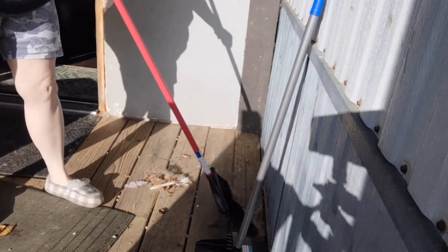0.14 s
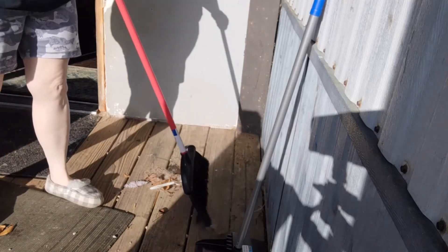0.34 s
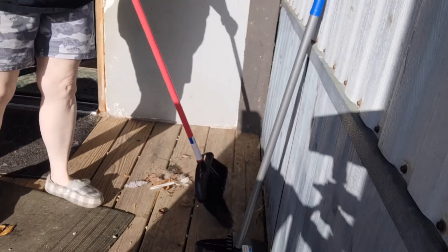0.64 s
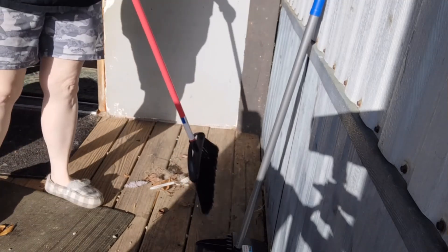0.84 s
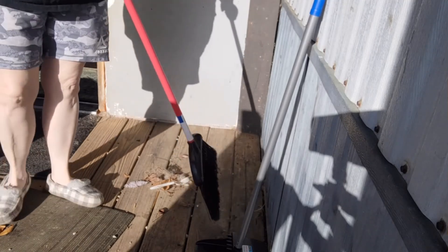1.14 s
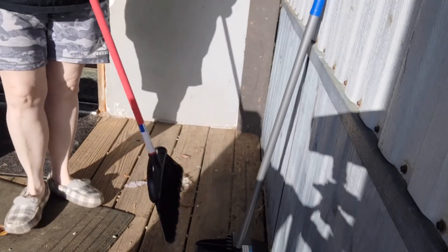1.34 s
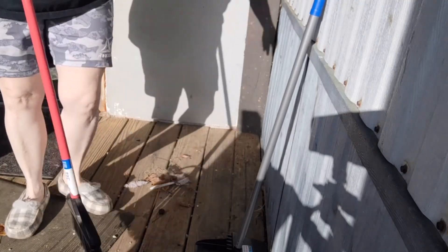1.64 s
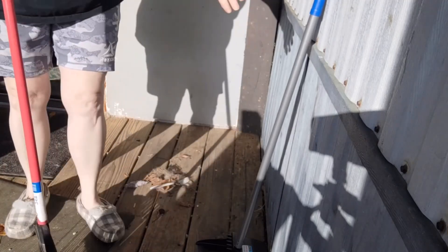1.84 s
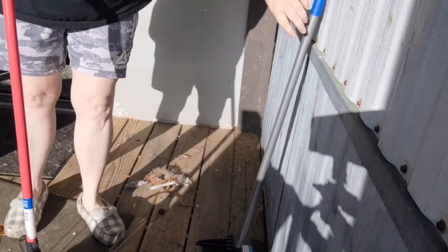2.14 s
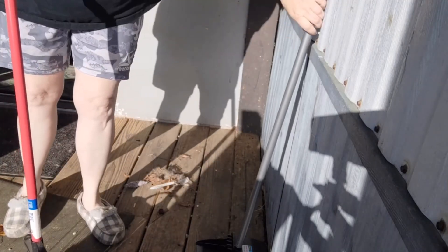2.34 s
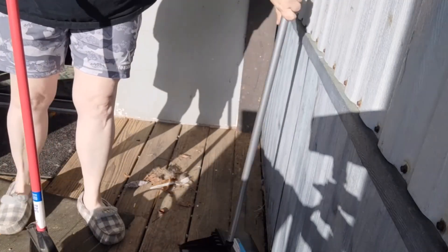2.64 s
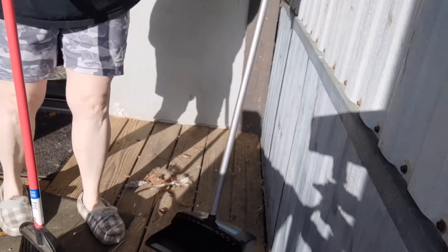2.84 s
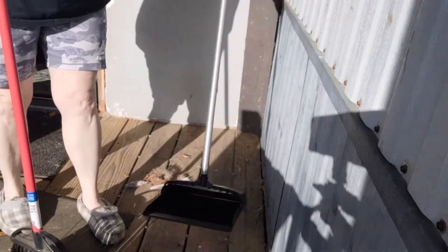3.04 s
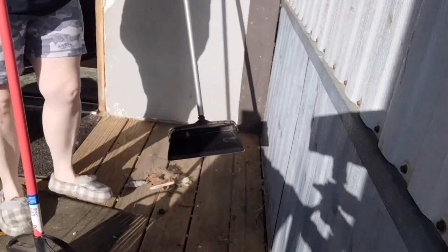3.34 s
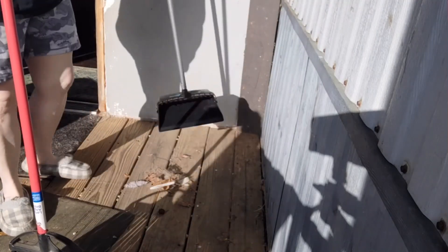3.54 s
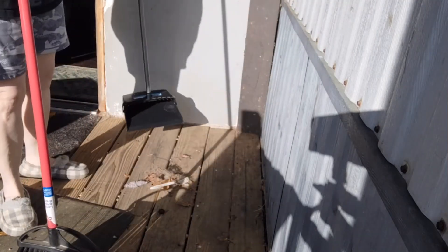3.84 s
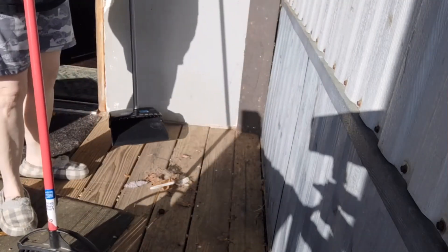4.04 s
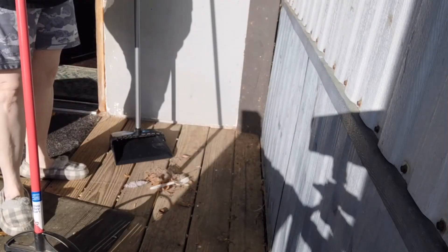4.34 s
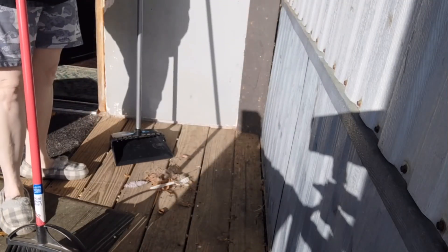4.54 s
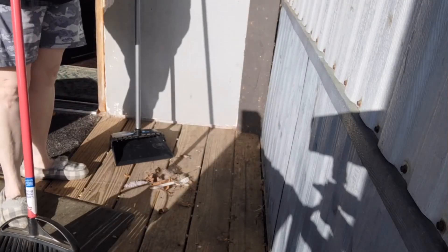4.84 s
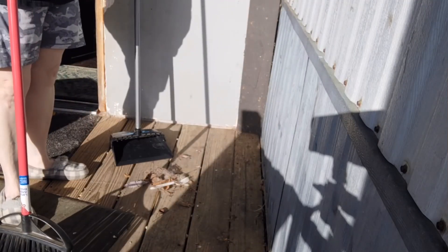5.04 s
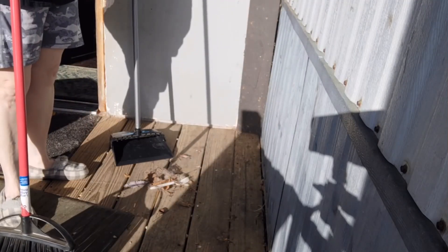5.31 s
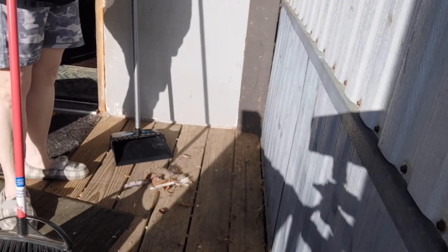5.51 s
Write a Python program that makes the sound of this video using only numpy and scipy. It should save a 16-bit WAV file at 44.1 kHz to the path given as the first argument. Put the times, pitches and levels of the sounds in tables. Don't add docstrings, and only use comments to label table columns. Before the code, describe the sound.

A quiet outdoor porch has low moving air, a distant hum and faint insect hiss. At about 0.15 s a broom head knocks a sheet wall sharply, and its bristles hiss over gritty boards, strongest near 0.3 s. A duller floor knock at 0.65 s begins a softer stroke peaking near 0.8 s. From 1.3 to 3.3 s slippers scuff, drag and softly thud on planks. Between 1.4 and 3.3 s a wren-like bird whistles a rapid falling-then-rising phrase six times, about three per second, blurred by echoes from trees and walls; the first lacks its opening. A dustpan lifts with a short hollow knock at 2.67 s. After a quiet gap with a thin far call near 3.5 s, it lands at 4.4 s with the loudest clack, quick bounces, scraping and a faint deck boom. Small ticks follow, then quiet air and a faint chirp near 5.1 s.

```python
import sys
import numpy as np
from scipy import signal
from scipy.io import wavfile

SR = 44100
rng = np.random.default_rng(int(sys.argv[2]) if len(sys.argv) > 2 else 0)


def voltage_ratio(level):
    return 10 ** (np.asarray(level, float) / 20)


def persist_wave(psi):
    counts = np.round(np.clip(psi, -1, 1) * 32767).astype(np.int16)
    wavfile.write(sys.argv[1], SR, np.atleast_2d(counts).T)


N = 250047


def at_hz(points, hz):
    curve_hz, value = np.array(points).T[:2]
    return np.interp(np.log(hz), np.log(curve_hz), value)


def rms_one(x):
    return x / np.sqrt(np.mean(x ** 2) + 1e-20)


def drift(rate_hz):
    knots = rng.standard_normal(400)
    return np.interp(np.arange(N) / SR * rate_hz, np.arange(400), knots)


def spread(mid, side, alike):
    alike = np.clip(alike, -1, 1)
    return np.sqrt(1 + alike) * mid + np.sqrt(1 - alike) * side * [[1], [-1]]


def pair(alike, size=N):
    mid, side = rng.standard_normal((2, size))
    return spread(mid, side, alike)


def coloured(spectrum, likeness, patchy_db, grain_db):
    out, together = 0, drift(22)
    low_hz, top_hz = spectrum[0][0], spectrum[-1][0]
    edges = np.geomspace(low_hz, top_hz, int(2 * np.log2(top_hz / low_hz)) + 2)
    grains = voltage_ratio(grain_db * np.minimum(rng.exponential(1, N), 5))
    white = rng.standard_normal((2, 2, N)) * grains
    for k, (low, high) in enumerate(zip(edges, edges[1:])):
        band = signal.butter(2, [low, high], "band", fs=SR, output="sos")
        mid, side = signal.sosfilt(band, white[k % 2])
        hz = np.sqrt(low * high)
        flicker_db = patchy_db * (0.7 * together + drift(14))
        gain = voltage_ratio(at_hz(spectrum, hz) + flicker_db)
        out = out + gain * spread(mid, side, at_hz(likeness, hz))
    return rms_one(out)


def narrow(x, hz, width_hz):
    r = np.exp(-np.pi * width_hz / SR)
    w = 2 * np.pi * hz / SR
    b, a = [1, 0, -1], [1, -2 * r * np.cos(w), r * r]
    once = signal.lfilter(b, a, x)
    return rms_one(signal.lfilter(b, a, once))


def echoes(x, t60, hold_s, alike):
    t = np.arange(SR) / SR
    tail = pair(alike, size=SR) * voltage_ratio(-60 * np.maximum(t - hold_s, 0) / t60)
    tail = tail / np.sqrt(np.mean(np.sum(tail ** 2, axis=1)))
    return signal.fftconvolve(x[None], tail, axes=1)[:, :N]


def blows(hits, modes, swell_ms, rattle_ms, rattle_db, trim_db, alike, dust_db):
    out, t = np.zeros((2, N)), np.arange(SR // 2) / SR
    hz, level_db, t60 = np.transpose(modes)[:, :, None]
    swell = 1 - np.exp(-(1000 * t / swell_ms) ** 2)
    dust_band = signal.butter(1, [900, 4500], "band", fs=SR, output="sos")
    for s, peak_db, crack_db, pan_db in hits:
        strength = voltage_ratio(level_db + rng.normal(0, 1.5, hz.shape))
        waves = strength * np.sin(2 * np.pi * hz * t)
        body = swell * np.sum(waves * voltage_ratio(-60 * t / t60), axis=0)
        shake = pair(alike, size=len(t)) * np.exp(-1000 * t / rattle_ms)
        damped = np.sum(swell * waves * voltage_ratio(-170 * t / t60), axis=0)
        rattle = signal.fftconvolve(shake, damped[None], axes=1)[:, :len(t)]
        dust = signal.sosfilt(dust_band, shake)
        loose = rattle / np.max(np.abs(rattle)) + voltage_ratio(dust_db) * dust
        knock = body / np.max(np.abs(body)) + voltage_ratio(rattle_db) * loose
        crack = np.diff(rng.standard_normal(len(t) + 1)) * np.exp(-t / 0.004)
        at = round(s * SR)
        pan = voltage_ratio([[pan_db / 2], [-pan_db / 2]])
        out[:, at:at + len(t)] += (voltage_ratio(peak_db + trim_db) * knock + voltage_ratio(crack_db) * crack) * pan
    return out


def swell_db(peak, rise, fall, shape):
    t = np.arange(N) / SR - peak
    return -20 * np.where(t < 0, -t / rise, t / fall) ** shape


def swells(rows):
    return sum(voltage_ratio(level_db + swell_db(peak, rise, fall, shape=1.3)) for peak, rise, fall, level_db in rows)


# [f/Hz, level/dB per Hz]
AIR_COLOUR = [(22, -21.5), (90, -10), (200, -27.5), (550, -26.5), (950, -34.5), (1700, -46.5),
              (3000, -40.5), (16000, -58.5)]
# [f/Hz, likeness -1 to 1]
AIR_LIKENESS = [(60, 0.98), (240, 0.94), (950, 0.32), (3770, -0.17), (15000, -1.1)]
# [f/Hz, width/Hz, level/dB, left-right
DRONES = [(95.1, 5.8, -59.5, 1), (120.45, 8.9, -62, 1), (502.2, 21, -70, 0.36), (4173, 400, -75, 0.43),
          (7240, 900, -84.5, .3), (11100, 15000, -84, 0.18), (15300, 1400, -83, .2)]


def background():
    out = voltage_ratio(-59.5) * coloured(AIR_COLOUR, AIR_LIKENESS, patchy_db=0.7, grain_db=0)
    for hz, width_hz, level_db, alike in DRONES:
        waver = voltage_ratio(level_db + 1.2 * drift(1.6))
        out = out + waver * narrow(pair(alike), hz, width_hz)
    return out


# [touch-down t/s, fastest t/s, slowing t/s, level/dB, touch-down burst level/dB]
STROKES = [
    (0.147, 0.281, 0.17, -40.5, -36),
    (0.661, 0.78, 0.12, -44, -48),
]


def strokes(under_db, lead_s, follow):
    out, t = 0, np.arange(N) / SR
    for touch, fastest, slowing, level_db, burst_db in STROKES:
        speed_db = swell_db(fastest - lead_s, rise=0.2, fall=slowing, shape=1.61)
        sweep = voltage_ratio(level_db + follow * speed_db)
        burst = voltage_ratio(burst_db + swell_db(touch, rise=0.003, fall=0.044, shape=1))
        landed = np.clip((t - touch) / 0.01, 0, 1)
        out = out + voltage_ratio(under_db) * (landed * sweep + burst)
    return out


# [peak t/s, rise t/s, fall t/s, level/dB]
BRUSHES = [
    (0.135, .03, .04, -47.5),
    (0.56, 0.036, 0.076, -55.5),
]
# [f/Hz, level/dB per Hz]
BRISTLE_HISS = [(2650, -36.5), (4500, -7), (7260, -1), (7860, 2.5), (8460, -4), (15100, 0.5), (16000, -4)]
GRIT = [(1500, -6), (2000, 0), (3000, -2), (4800, -3), (5600, -8)]
BOARD_RUMBLE = [(180, -18.5), (260, -3.5), (340, 3), (500, -4.5), (700, 5), (1000, 0.5), (1500, -9),
                (2200, -32.5)]
# [f/Hz, likeness -1 to 1]
LIKENESS = [(60, 1), (180, 1), (550, 0.76), (1650, 0.22), (4970, -0.28), (15000, 0.12)]


def broom():
    hiss = strokes(under_db=0, lead_s=0, follow=0.72) + swells(BRUSHES)
    grit = strokes(under_db=-8.5, lead_s=0.024, follow=0.63)
    rumble = strokes(under_db=-8.5, lead_s=0.04, follow=0.66)
    bristles = hiss * coloured(BRISTLE_HISS, LIKENESS, patchy_db=1.7, grain_db=3.2)
    grains = grit * coloured(GRIT, LIKENESS, patchy_db=1.2, grain_db=2.5)
    boards = rumble * coloured(BOARD_RUMBLE, LIKENESS, patchy_db=1.8, grain_db=3.0)
    return bristles + grains + boards


# [t/s, peak level/dB, crack level/dB, left-right level/dB]
HEAD_ON_WALL = [
    (0.119, -60, -47, -2),
    (0.15, -10.5, -34.5, -2),
]
HEAD_ON_BOARD = [
    (0.651, -40, -79, -2),
    (0.655, -18.5, -49, -1.2),
]
# [f/Hz, level/dB, 60 dB decay t/s]
WALL = [(250, -11, .1), (531, -13.5, 0.16), (693, -7.5, 0.098), (1050, -9, 0.12), (1190, 3.5, 0.053),
        (1516, 1.5, .055), (2000, -10, 0.048), (2600, -22.5, .03), (3550, -14, .03)]
BOARD = [(168, -19.5, 0.45), (388, -12.5, 0.19), (582, -6.5, 0.14), (740, -5, 0.069), (904, 10, 0.034),
         (1394, -12, 0.066), (2729, -50.5, 0.066)]


def broom_knocks():
    wall = blows(HEAD_ON_WALL, WALL, swell_ms=0.44, rattle_ms=30, rattle_db=-6.0, trim_db=-7.0,
                 alike=0.3, dust_db=-14.5)
    board = blows(HEAD_ON_BOARD, BOARD, swell_ms=2.7, rattle_ms=18.6, rattle_db=-1.5, trim_db=-4.5,
                  alike=0.84, dust_db=-15)
    return wall + board


# [peak t/s, rise t/s, fall t/s, level/dB]
DRAGS = [(0.135, 0.019, 0.039, -48), (0.285, 0.027, 0.01, -46.5), (0.41, .012, .012, -70),
         (1.375, 0.031, 0.11, -47.5), (1.514, 0.0074, 0.15, -62), (1.825, 0.029, 0.087, -44.5),
         (2.335, 0.044, 0.061, -45), (2.4, 0.0091, 0.083, -63), (2.64, 0.022, 0.023, -57),
         (2.675, 0.0032, 0.03, -37), (2.85, 0.026, 0.18, -66), (3.066, 0.015, 0.035, -43),
         (3.295, 0.085, 0.063, -58), (3.802, 0.028, 0.082, -66.5), (4.295, 0.041, .03, -64.5),
         (4.432, 0.00535, 0.068, -27), (4.54, .05, 0.2, -59.5), (4.63, .01, 0.19, -74)]
# [peak t/s, rise t/s, fall t/s, hiss level/dB, finest hiss against it level/dB]
SLIPS = [(1.34, 0.2, 0.13, -66, 4.5), (1.455, 0.041, 0.1, -51, -3), (1.823, 0.029, 0.064, -40, -14.5),
         (2.085, 0.045, 0.089, -72, 1), (2.17, 0.12, 0.047, -81.5, 13.5), (2.344, 0.057, 0.29, -65, -22),
         (2.464, 0.16, 0.055, -67.5, 2), (2.555, 0.065, 0.09, -55, -4), (2.655, 0.059, 0.097, -49.5, -12),
         (2.76, 0.037, 0.14, -66, 5), (2.84, 0.0061, .13, -48, -8), (3.067, 0.027, .14, -58, -6),
         (3.297, 0.043, .05, -52, -22), (4.336, 0.038, 0.086, -64, 15.5), (4.427, 0.015, 0.047, -45, -25),
         (4.502, 0.0078, 0.046, -60.5, 7), (4.635, 0.01, 0.084, -91, 19)]
# [f/Hz, level/dB per Hz]
SOLE_HISS = [(5000, -13.5), (6500, 3), (7800, -3), (10500, -12.5)]
FINE_HISS = [(10500, 0), (13000, 6.5), (16000, -2)]
SCRAPE = [(300, -11.5), (500, -3), (750, 2), (1200, 6.5), (1700, -8.5), (2300, -20)]


def scuffs():
    hiss = swells([row[:4] for row in SLIPS])
    fine = swells([(peak, rise, fall, hiss_db + fine_db) for peak, rise, fall, hiss_db, fine_db in SLIPS])
    scrape = swells(DRAGS)
    grit = voltage_ratio(-1) * np.sqrt(hiss * scrape)
    layers = [(hiss, SOLE_HISS), (fine, FINE_HISS), (grit, GRIT), (scrape, SCRAPE)]
    return sum(gain * coloured(colour, LIKENESS, patchy_db=2.4, grain_db=3.2) for gain, colour in layers)


# [t/s, peak level/dB, f/Hz]
TICKS = [(1.452, -38.5, 7500), (1.809, -41, 6500), (2.838, -40, 7800), (4.3268, -55, 12100),
         (4.5, -43, 7200), (4.628, -58.5, 7190), (0.547, -52, 8800), (2.515, -58, 10750),
         (3.005, -63, 6650),
         (4.5828, -53.5, 3860), (4.627, -53, 1600)]


def ticks():
    out, t = np.zeros((2, N)), np.arange(600) / SR
    for s, peak_db, hz in TICKS:
        click = np.diff(pair(1.0, size=601)) * 0.37
        snap = click + np.sin(2 * np.pi * hz * t)
        out[:, round(s * SR):][:, :600] += voltage_ratio(peak_db + 2.0) * snap * np.exp(-t / 0.002)
    return out


# [start t/s, length t/s, f/Hz, width/Hz, level/dB]
FAR_CALLS = [
    (3.46, .27, 5900, 130, -73),
    (5.098, .1, 7400, 1100, -66),
    (4.71, .75, 3000, 600, -78),
    (.95, .4, 2700, 600, -82),
]


def far_calls():
    out, t = 0, np.arange(N) / SR
    for start, length, hz, width_hz, level_db in FAR_CALLS:
        done = np.clip((t - start) / length, 0, 1)
        out = out + voltage_ratio(level_db) * np.sin(np.pi * done ** 0.65) * narrow(pair(0.63), hz, width_hz)
    return out


# [t/s, peak level/dB, crack level/dB, left-right level/dB]
STEPS = [(1.51, -48, -94, -0.5), (1.808, -82, -83, -0.56), (2.297, -48, -78, 0.38),
         (2.319, -49.5, -83, -1.2), (2.393, -53.5, -83, 0.5), (3.058, -49, -66, 0.62)]
STUBS = [(1.344, -49.5, -60, -6), (1.506, -36.5, -60, 2), (1.809, -51, -68, 1), (2.328, -60, -71, 10),
         (3.055, -42, -74, -7)]
# [f/Hz, level/dB, 60 dB decay t/s]
PLANK = [(245, -1, 0.11), (354, 11, 0.045), (637, 7.5, 0.048), (823, -28, 0.058)]
RUBBER = [(424, 2.5, 0.06), (690, 11, 0.085), (964, 10, 0.032), (1230, 15, 0.013), (1616, 7, 0.045)]


def slipper_knocks():
    steps = blows(STEPS, PLANK, swell_ms=0.89, rattle_ms=54, rattle_db=5.0, trim_db=-0.5,
                  alike=0.93, dust_db=-37)
    stubs = blows(STUBS, RUBBER, swell_ms=0.58, rattle_ms=20.4, rattle_db=0, trim_db=0.0,
                  alike=0.36, dust_db=-41)
    return steps + stubs


# [start t/s, level/dB, opening notes level/dB, reach of the opening notes 0-1]
SONG = [
    (1.405, -44, -40, .9),
    (1.724, -41.5, -6, 0.9),
    (2.051, -41.5, -8, 0.98),
    (2.373, -41, -4.5, 0.9),
    (2.693, -41.5, -2, 0.67),
    (3.031, -44, -2, 0.47),
]
# [t/s from phrase start, from f/Hz, to f/Hz, early bend of the glide, level/dB]
NOTES = [
    (0, 7080, 4623, 4.4, 0.5),
    (0.02, 4700, 4610, 1.1, -9),
    (0.046, 4700, 2616, 0.47, 2.5),
    (0.088, 2800, 2600, .5, -17),
    (.096, 2544, 1928, 2.42, -2),
    (.142, 1900, 2000, .3, -28.5),
    (.19, 2212, 2918, 5.38, 1),
    (0.241, 3197, 2892, 1.01, 2),
]


def bird():
    song = np.zeros(N)
    ends = [note[0] for note in NOTES[1:]] + [0.29]
    for start, phrase_db, opening_db, reach in SONG:
        for k, ((s, from_hz, to_hz, bend, note_db), end) in enumerate(zip(NOTES, ends)):
            s = s - 0.0004 * opening_db * (k == 2)
            weak_db = opening_db * ((k < 2) + 0.16 * (k == 2))
            t = np.arange(round((end - s) * SR)) / SR
            glide = (1 - np.exp(-bend * t / t[-1])) / (1 - np.exp(-bend))
            hz = from_hz + (to_hz - from_hz) * glide
            hz = hz - (1 - reach) * np.maximum(hz - 4700, 0)
            attack_s, release_s = 0.0031, 0.046 if k == len(NOTES) - 1 else 0.0067
            shape = np.clip(np.minimum(t / attack_s, (t[-1] - t) / release_s), 0, 1)
            level = voltage_ratio(phrase_db + note_db + weak_db + rng.normal(0, 1.2))
            whistle = np.sin(2 * np.pi * np.cumsum(hz) / SR)
            song[round((start + s) * SR):][:len(t)] += level * shape * whistle
    trees = voltage_ratio(6.0) * echoes(song, t60=0.24, hold_s=0.026, alike=0.4)
    walls = voltage_ratio(-5.0) * echoes(song, t60=0.74, hold_s=0.034, alike=0.22)
    return voltage_ratio(-5.0) * song + trees + walls


# [t/s, peak level/dB, crack level/dB, left-right level/dB]
PAN_LIFT = [
    (2.647, -48, -57, 0.0),
    (2.672, -14.5, -44, -1),
]
PAN_DROP = [
    (4.397, -22.5, -52, -1.0),
    (4.427, -1, -51.5, -1.0),
    (4.447, -12.5, -48, -0.5),
    (4.474, -41.5, -60, 1.5),
]
# [f/Hz, level/dB, 60 dB decay t/s]
PAN_HELD = [(224, -16, 0.066), (465.7, -11.5, 0.087), (551, 2, 0.034), (826, -3.5, 0.011),
            (1067, -5, 0.019), (1423, -18.5, 0.036)]
PAN_DOWN = [(220, -11.5, 0.13), (388.7, -11, 0.15), (551.4, -4, 0.2), (589.4, 1, 0.17), (624, 2, 0.058),
            (710, -13.5, 0.009), (943, -22.5, .08), (1040, -6, 0.15), (1089, -13, 0.15), (1390, -29, 0.05),
            (1843, -23.5, 0.078), (2550, -23, .05)]


def dustpan_knocks():
    lift = blows(PAN_LIFT, PAN_HELD, swell_ms=1.3, rattle_ms=27.0, rattle_db=-8.5, trim_db=-0.5,
                 alike=0.51, dust_db=-20.5)
    drop = blows(PAN_DROP, PAN_DOWN, swell_ms=1.9, rattle_ms=29.4, rattle_db=0.0, trim_db=-7.5,
                 alike=0.41, dust_db=-30.5)
    return lift + drop


# [f/Hz, level/dB, 60 dB decay t/s]
DECK = [(58.6, 14.5, 0.13), (84.3, 0, 1), (132, -10, 0.32), (138, 1.5, 0.34)]


def deck():
    return blows([(4.428, -31.5, -94, 0)], DECK, swell_ms=5.4, rattle_ms=60, rattle_db=4, trim_db=-3,
                 alike=1.0, dust_db=-60)


def porch_corner(knocks):
    high_pass = signal.butter(2, 720, "high", fs=SR, output="sos")
    wall_sound = signal.sosfilt(high_pass, knocks.mean(axis=0))
    return knocks + voltage_ratio(-13) * echoes(wall_sound, t60=0.46, hold_s=0.012, alike=0.74)


def scene():
    knocks = porch_corner(broom_knocks() + ticks() + slipper_knocks() + dustpan_knocks())
    return background() + broom() + knocks + scuffs() + far_calls() + bird() + deck()


def top_cut(x):
    return signal.sosfilt(signal.butter(12, 16960, fs=SR, output="sos"), x)


def record(dry):
    low_pass = signal.cheby2(14, 50, 16500, fs=SR, output="sos")
    mix = signal.sosfilt(low_pass, dry)
    return top_cut(mix)


dry = scene()
out = record(dry)
persist_wave(out)
```